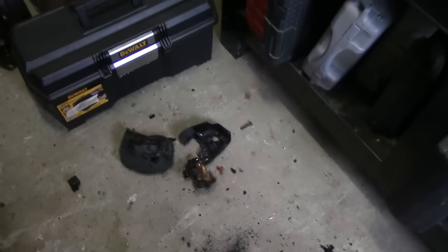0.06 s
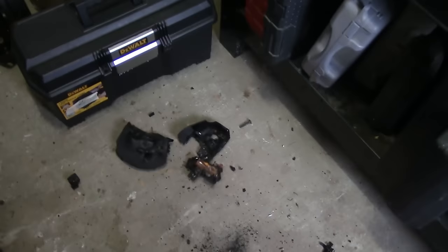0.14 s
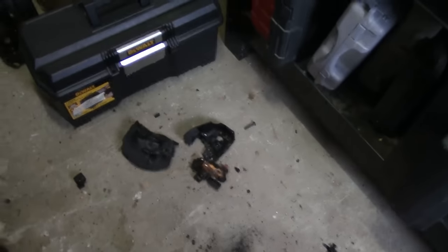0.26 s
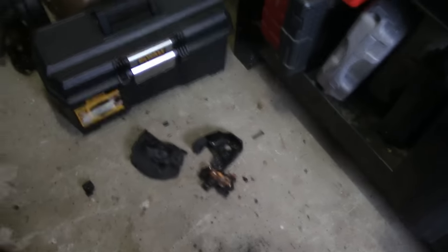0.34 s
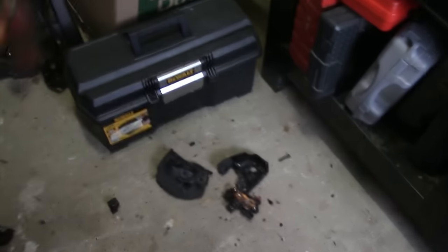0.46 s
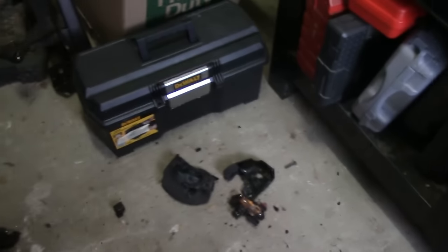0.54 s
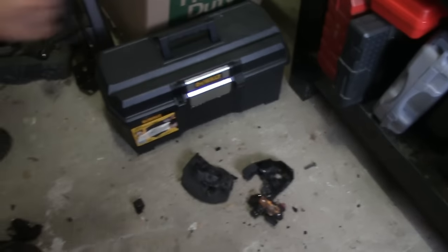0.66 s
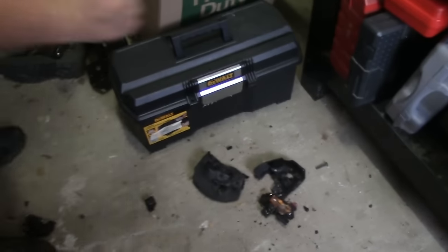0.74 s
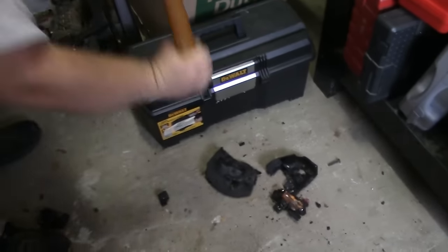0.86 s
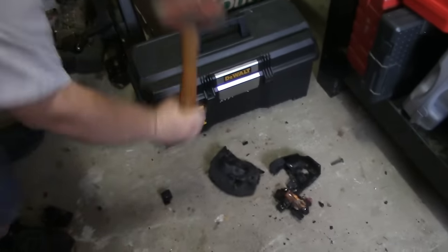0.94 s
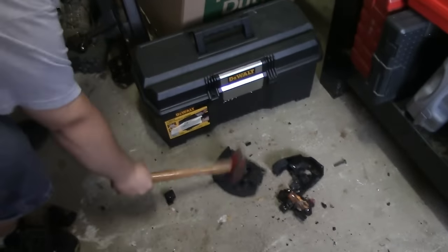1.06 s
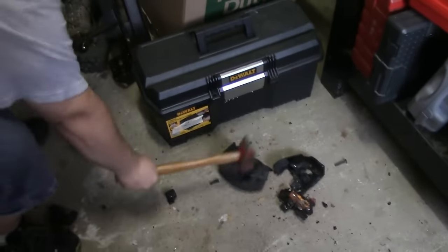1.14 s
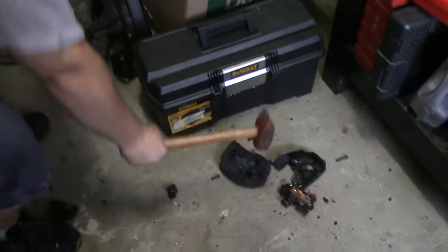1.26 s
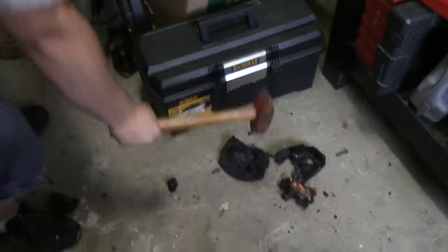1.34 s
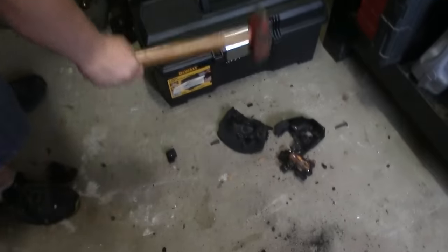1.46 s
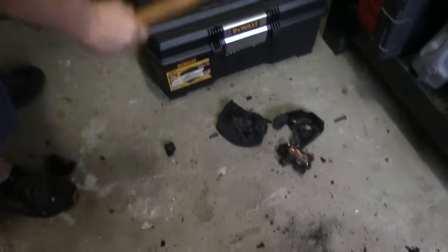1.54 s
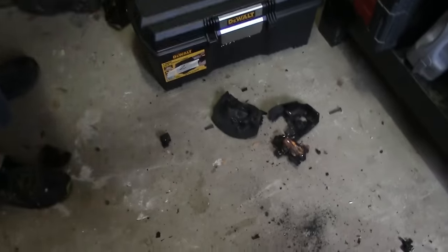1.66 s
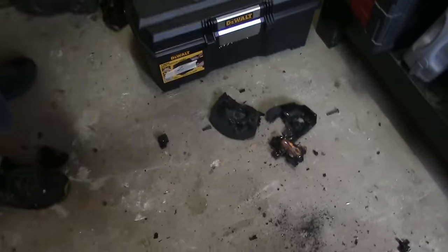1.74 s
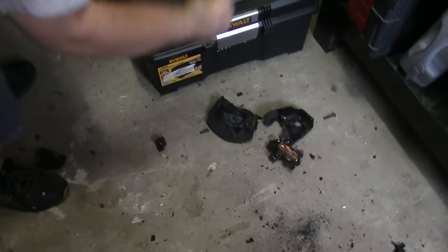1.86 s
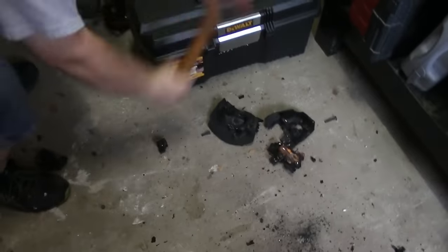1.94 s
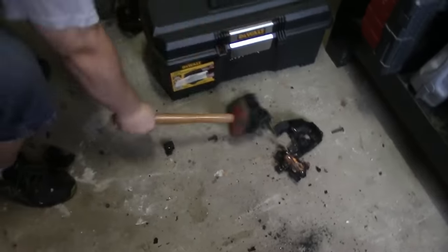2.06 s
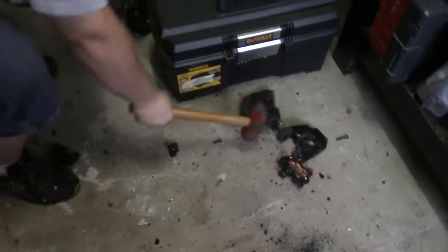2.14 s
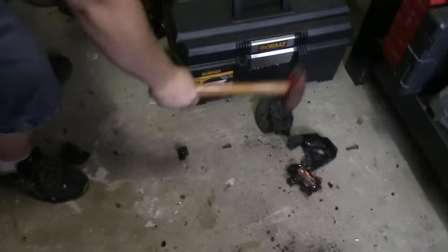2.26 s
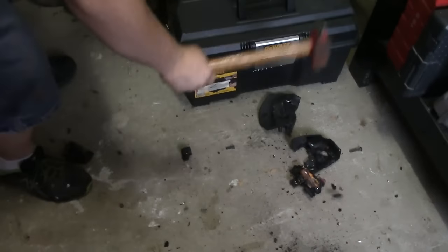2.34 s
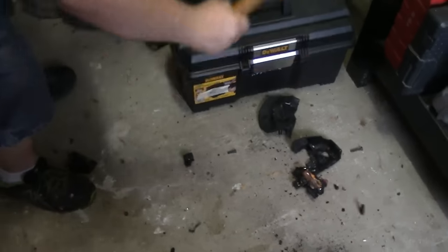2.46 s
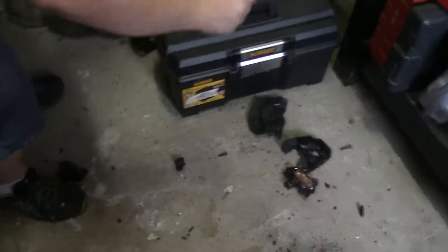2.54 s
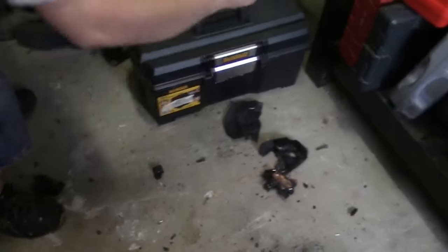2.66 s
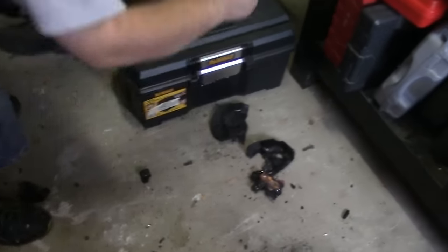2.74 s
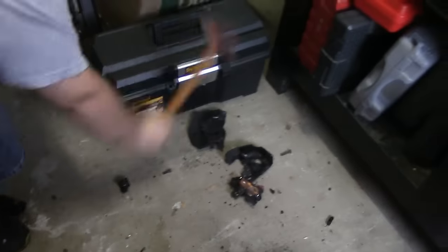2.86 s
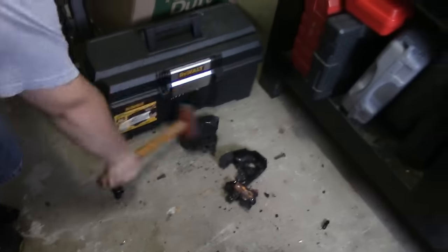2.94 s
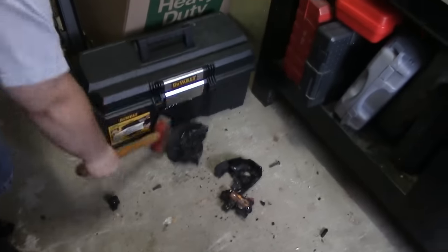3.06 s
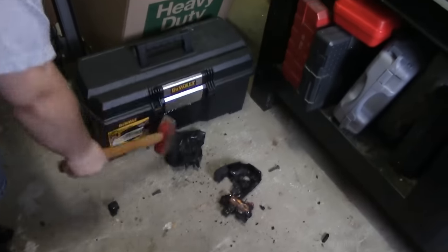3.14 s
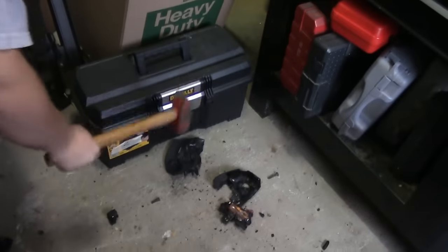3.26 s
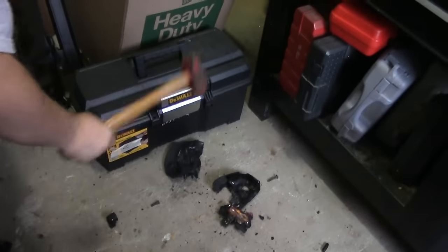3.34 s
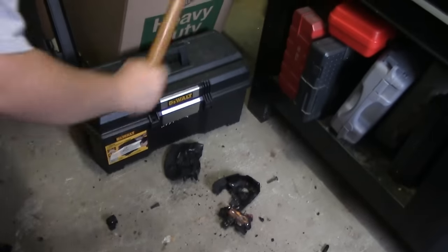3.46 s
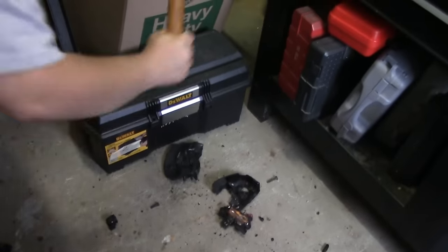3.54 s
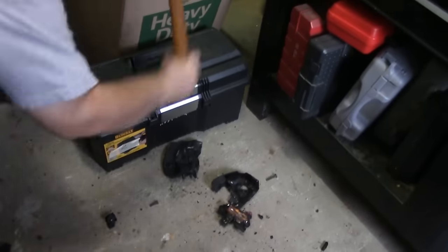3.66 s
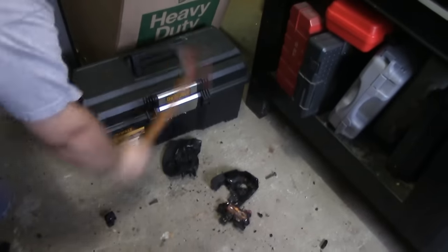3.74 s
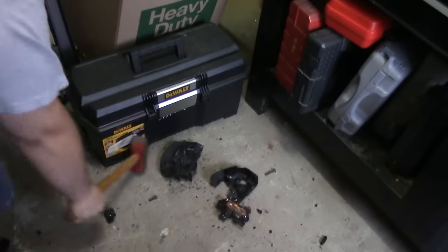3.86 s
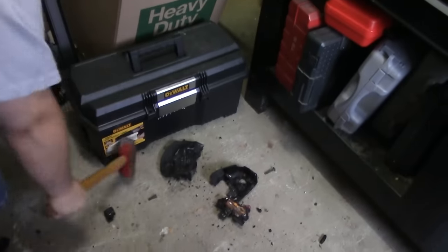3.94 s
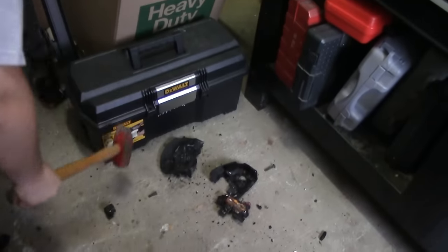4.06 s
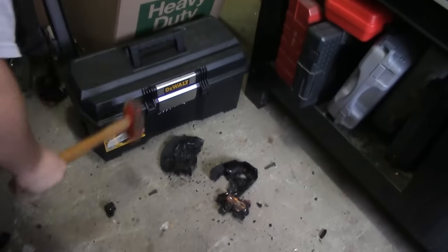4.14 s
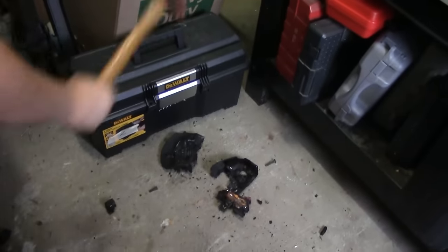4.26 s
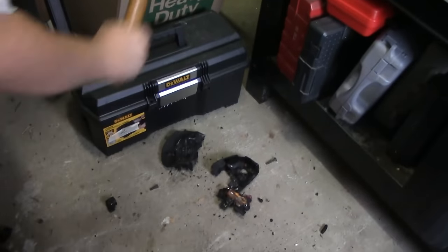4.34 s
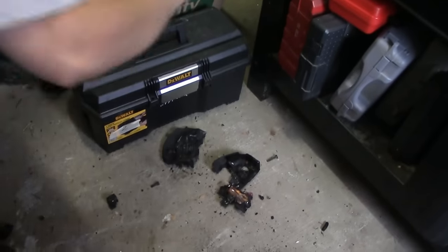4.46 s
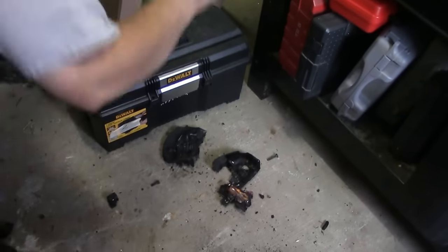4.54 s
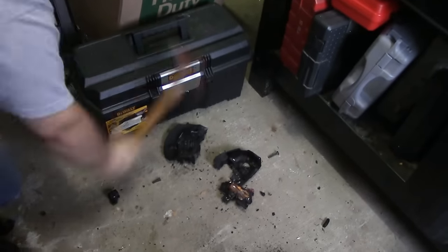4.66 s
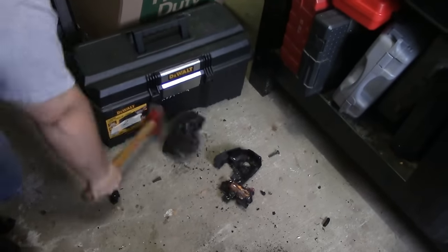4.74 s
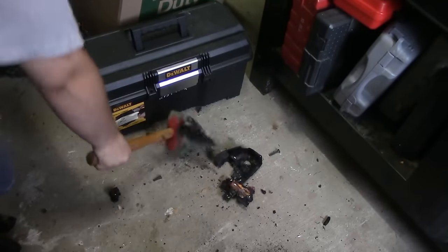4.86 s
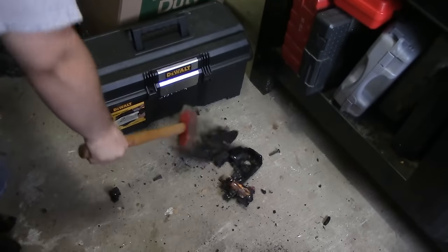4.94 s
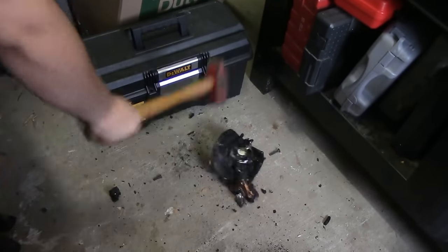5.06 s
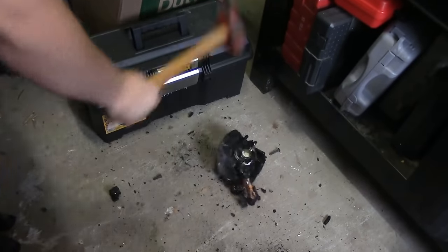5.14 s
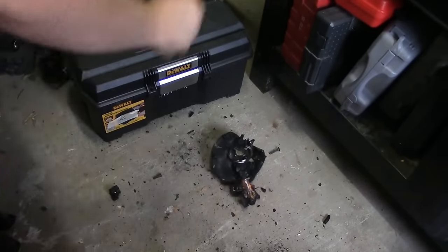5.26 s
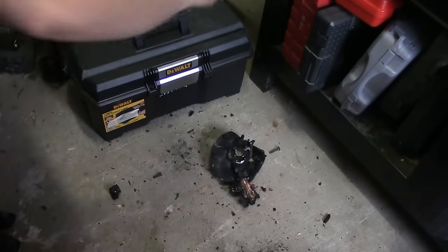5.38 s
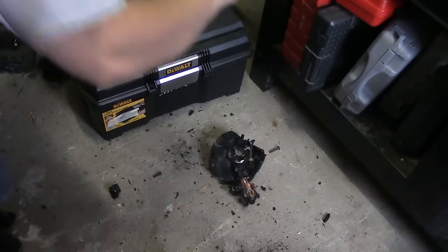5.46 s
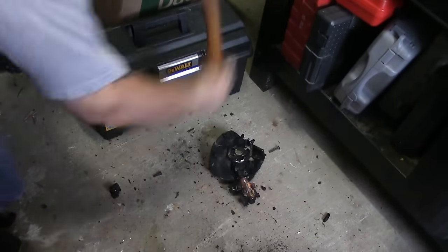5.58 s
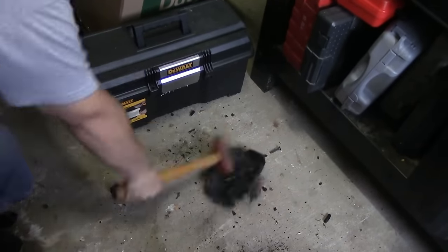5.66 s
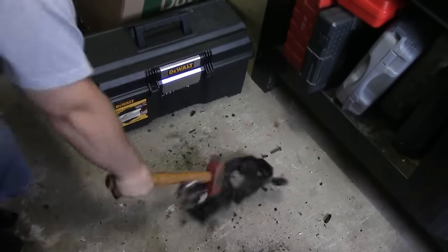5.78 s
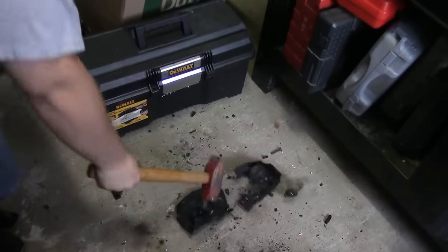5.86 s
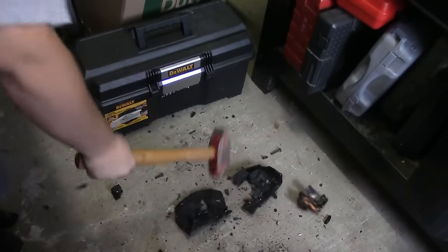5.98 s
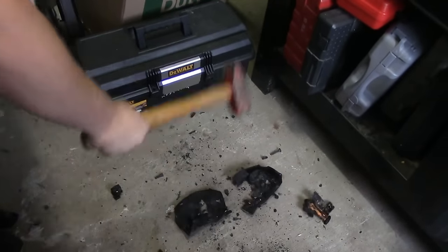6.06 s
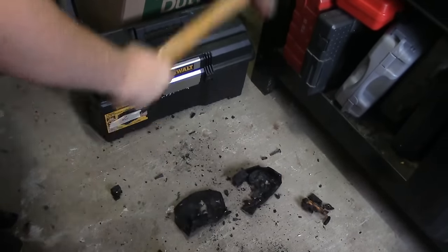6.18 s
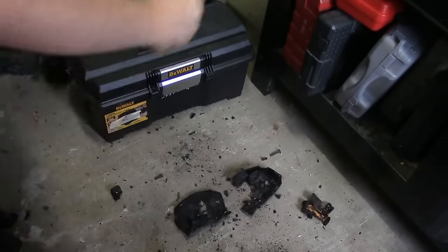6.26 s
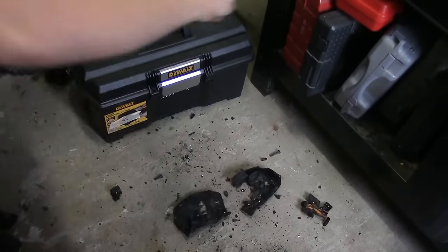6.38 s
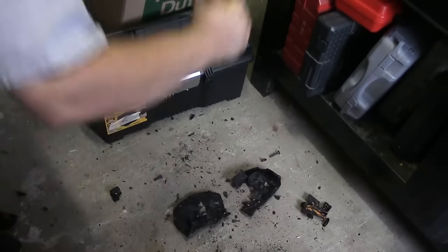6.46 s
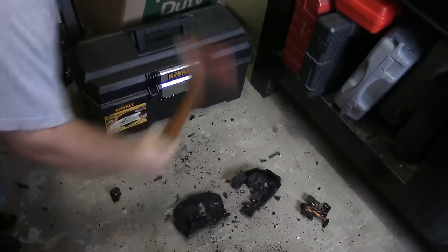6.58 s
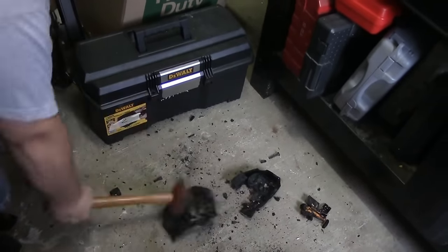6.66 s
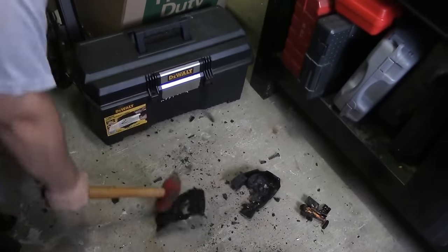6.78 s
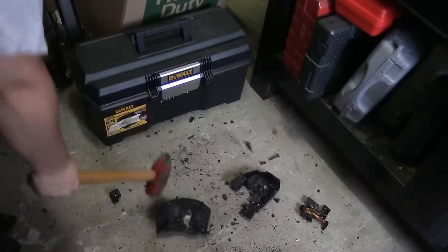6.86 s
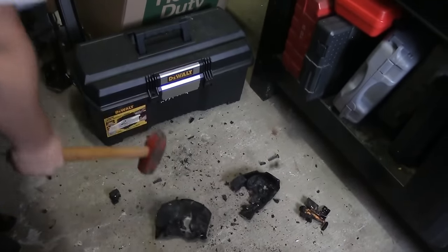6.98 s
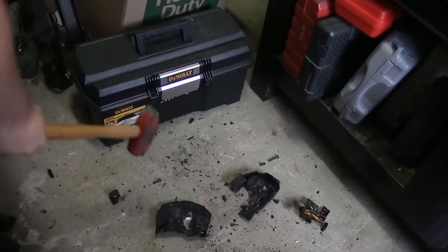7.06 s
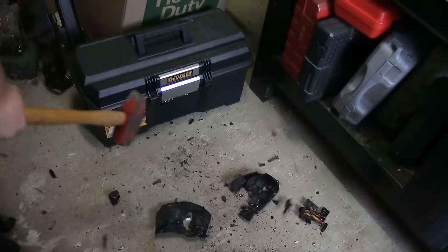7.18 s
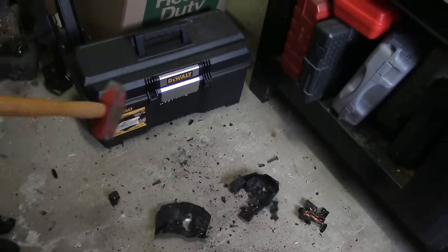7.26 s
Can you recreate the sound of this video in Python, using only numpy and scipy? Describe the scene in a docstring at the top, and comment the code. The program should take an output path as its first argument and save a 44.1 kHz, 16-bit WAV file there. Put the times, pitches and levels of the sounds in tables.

```python
"""Hammering plastic in a garage

A hammer smashes burnt plastic on a concrete floor, eight blows about a second apart. Each blow
crunches the piece and makes it ring. Plastic and clockwork bits fly, bump a toolbox and skitter
away. Shoes scuff and a motor hums faintly. An automatic gain control turns the sound down at
loud blows, then lets it creep back up."""
import sys
import numpy as np
from scipy import signal
from scipy.fft import rfft, irfft, next_fast_len
from scipy.io import wavfile
from scipy.ndimage import uniform_filter1d

SR = 44100
rng = np.random.default_rng(int(sys.argv[2]) if len(sys.argv) > 2 else 0)


def materialize(psi):
    """Save the field psi as 16-bit PCM at rate SR to the path in sys.argv[1].

    A 1-D psi becomes a single channel; in a 2-D psi each row is a channel.
    """
    bounded = np.clip(np.atleast_2d(psi).T, -1, 1)
    quanta = np.round(bounded * 32767).astype(np.int16)
    wavfile.write(sys.argv[1], SR, quanta)


N = 322715
TIME = np.arange(N) / SR
HIT_TIME = np.arange(SR // 4) / SR  # seconds into one impact

# tones of the motor's hum: f/Hz, level/dB
HUM_TONES = [(138, -63.5), (276, -54.5), (388, -58), (412, -60), (554, -59.5), (690, -65.5)]
# air rush of the motor's fan: f/Hz, level/dB
FAN_CURVE = [(30, -37.5), (85, -21), (130, -5), (200, -5.5), (420, -1), (700, 0.5), (1000, -4),
             (1400, -2.5), (2100, -8.5), (3200, -13.5), (5000, -22), (8000, -27), (15000, -43.5)]
# shoe scuffs: t/s, length/s, level/dB, treble/dB
SHOE_SCUFFS = [(0.653, 0.071, -43.5, -5), (0.888, 0.012, -46.5, 8), (0.927, 0.086, -55, 19),
               (0.996, 0.0045, -48, 26)]
# the garage's echo: f/Hz, level/dB, time to fade by 60 dB/s
ECHO_BANDS = [(60.4, -14, 0.25), (160, 0.5, 0.36), (444, 6.5, 0.3), (1240, -1, 0.42), (3470, 0.5, 0.39),
              (6500, 2, 0.39), (8850, 0, 0.32), (15000, -0.5, 0.28)]
# tone of the difference between two microphones: f/Hz, level/dB
SIDE_CURVE = [(50, 23), (150, -2), (400, -7), (1000, -1.5), (2200, 3.5), (5000, 8), (9000, 10),
              (14000, -0.5)]
# clockwork bits hitting the floor: t/s, level/dB, top treble/dB
CLOCKWORK_HITS = [(5.973, -17, -1), (5.998, -23, -1), (6.045, -30, 3), (6.071, -29, -7), (6.387, -39.5, 7),
                  (7.250, -23.5, 10)]
# ringing of the clockwork metal: f/Hz, width/Hz, level/dB
CLOCKWORK_RINGS = [(3130, 197, 0), (5040, 97, -7), (5880, 110, 3), (6080, 170, -1), (6570, 270, -4),
                   (8460, 500, -2), (11100, 880, -3), (12500, 500, -12)]
# pieces bumping the toolbox: t/s, level/dB, bass/dB
TOOLBOX_BUMPS = [(3.023, 2, -2), (3.082, -14.5, 2), (3.902, -7, 1), (4.782, 0.5, 3.5), (4.8, 5.5, 2),
                 (4.821, -2, -24), (4.897, -13, -10)]
# ringing of the toolbox walls: f/Hz, width/Hz, level/dB
TOOLBOX_RINGS = [(169.3, 32, 4.5), (267.8, 59, 3.5), (298, 7.3, -0.5), (370, 44, -8), (477, 49, -12.5),
                 (894, 180, -14)]
# larger plastic pieces landing: t/s, level/dB, f/Hz, ring/dB
PIECE_LANDINGS = [ (0.1183, -12.5, 1280, -0.5), (0.335, -30.5, 1124, 3.5), (2.384, -27.5, 2480, -4.5),
                  (3.129, -18.5, 3300, 0), (5.062, -12.5, 1660, -1), (5.086, -18.5, 1780, -14),
                  (5.326, -29, 1560, -7), (6.198, -32, 3310, 6), (6.785, 2, 387, -4),
                  (6.914, -13.5, 2863, 5.5), (6.943, -18.5, 2050, 5), (7.102, -25, 3040, 6), ]
# tone of cracking plastic: f/Hz, level/dB
CRACK_CURVE = [(40, -47), (150, -14.5), (450, 0), (750, 1), (1100, 1.5), (2000, 4.5), (3500, 3), (5500, -1),
               (9500, -2.5), (12500, -12.5), (16000, -22)]
# ringing of the steel hammer head: f/Hz, width/Hz, level/dB
HEAD_RINGS = [(3284, 17, 2.5), (7480, 130, 1), (9700, 260, -1)]
# hammer blows (the first is two rows); the piece breaks and turns, so its pitch moves:
# t/s, level/dB, crushing time/ms, f/Hz, lower ring/dB, upper ring/dB, shatter/0-1, body/dB, thump/dB
HAMMER_BLOWS = [ (0.0005, -8, 2, 882, 5.5, -2.5, .16, 2, -37.5),
                (0.0100, 7.5, 1, 1300, -2.5, -16.5, 0.1, 1, -42),
                (1.1220, 19, 3.82, 1473, 2.5, 7.5, .16, 4, -11),
                (2.0560, 19.5, 2.67, 1680, -2.5, -6.5, .14, -4.5, -19),
                (2.9663, 11, 2.72, 1610, -4.5, -11.5, .14, -15, -25.5),
                (3.8302, 9.5, 2.1, 1600, -15, -5.5, 0.3, -1.5, -31),
                (4.7536, 15.5, 3.1, 1900, 1.5, -5.5, .42, 6.5, -25.5),
                (5.6999, 14.5, 2.88, 2350, -4, -6.5, 0.4, -11, -42.5),
                (6.6946, 23.5, 2.06, 1425, -24, 2, .11, 1, -9.5), ]
# tone of floor grit, of crumbs, and of an impact's direct side signal: f/Hz, level/dB
GRIT_CURVE = [(200, -7), (800, 5), (2500, 4.5), (6000, -11), (14000, -28)]
CRUMB_CURVE = [(300, -7), (1500, 3.5), (4000, -4.5), (9000, -11), (15000, -19.5)]
DIRECT_SIDE_CURVE = [(200, -4), (2000, 4.5), (5000, -2), (12000, 1)]


def gain(db):
    """Turn decibels into a number to multiply by."""
    return 10 ** (np.asarray(db) / 20)


def unit(x):
    """Scale a sound so that its energy is 1."""
    return x / np.sqrt(np.sum(x ** 2) + 1e-18)


def add(out, start_s, x):
    """Mix x into out at a given time."""
    i = min(max(int(start_s * SR), 0), N)
    out[..., i:i + x.shape[-1]] += x[..., :N - i]


def colour(x, curve):
    """Shape the tone along a curve of (f/Hz, level/dB) points."""
    size = next_fast_len(len(x) + 4096, True) // 2 * 2
    hz, db = np.transpose(curve)
    log_hz = np.log(np.fft.rfftfreq(size, 1 / SR) + 1)
    cepstrum = irfft(np.log(gain(np.interp(log_hz, np.log(hz), db))))
    # this folding keeps the filter from sounding before its input
    cepstrum[1:size // 2] *= 2
    cepstrum[size // 2 + 1:] = 0
    return irfft(rfft(x, size) * np.exp(rfft(cepstrum)))[:len(x)]


def ring(x, hz, width_hz):
    """Ring at one pitch; the narrower the width, the longer it lasts."""
    return signal.lfilter(*signal.iirpeak(hz, hz / width_hz, fs=SR), x)


def ring_object(force, rings):
    """A struck object rings at several pitches at once."""
    return unit(sum(gain(db) * ring(force, hz, width) / np.sqrt(width) for hz, width, db in rings))


def fade(delay_s, decay_s):
    """Start suddenly after a delay, then die away."""
    return (HIT_TIME >= delay_s) * np.exp(-np.abs(HIT_TIME - delay_s) / decay_s)


def drift(rate_hz):
    """Wander smoothly at random, roughly between -1 and 1."""
    step = int(SR / rate_hz)
    return uniform_filter1d(np.repeat(rng.standard_normal(N // step + 1), step), step)[:N]


def fan(level_db):
    """The motor's fan pushes air with a soft, steady rush."""
    return gain(level_db) * np.sqrt(N) * unit(colour(rng.standard_normal(N), FAN_CURVE))


def motor(waver_hz=3.9, flutter_db=2.2):
    """A motor hums with tones that waver in level and pitch."""
    hum = 0
    for hz, db in HUM_TONES:
        level = gain(db + flutter_db * drift(rate_hz=8))
        pitch_hz = hz + waver_hz * drift(rate_hz=28)
        hum = hum + level * np.sin(2 * np.pi * np.cumsum(pitch_hz) / SR)
    return np.sqrt(2) * hum


def scuffs(grain_db=4):
    """Soles drag briefly over grit; crushed grains sound crisper."""
    grains = rng.standard_normal(N) * gain(grain_db * rng.standard_normal(N))
    grit = colour(grains, GRIT_CURVE)
    out = np.zeros(N)
    for t, length_s, db, treble_db in SHOE_SCUFFS:
        swell = np.exp(-2 * ((TIME - t) / length_s) ** 2)
        out += gain(db) * swell * unit(colour(grit, [(1500, 0.007), (5000, treble_db)]))
    return np.sqrt(N) * out


def garage_echo(first_echo_s=0.001, build_s=0.0012):
    """Walls and shelves echo differently for every spot on the floor."""
    size = SR * 2 // 3
    t = np.arange(size) / SR
    hz, levels_db, fades_s = np.transpose(ECHO_BANDS)
    noise = rfft(rng.standard_normal(size))
    log_hz = np.log(np.fft.rfftfreq(size, 1 / SR) + 1)
    tail = 0
    for db, fade_s, band in zip(levels_db, fades_s, np.eye(len(hz))):
        band_noise = irfft(noise * np.interp(log_hz, np.log(hz), band), size)
        tail = tail + gain(db - 60 * t / fade_s) * band_noise
    return unit(tail * (1 - np.exp(-np.maximum(t - first_echo_s, 0) / build_s)))


def in_garage(x, echo_db, direct_side_db=-7.5):
    """An impact and its echo, as mid (what two microphones share) and side (how they differ)."""
    heard = gain(echo_db) * np.array([signal.fftconvolve(x, garage_echo()) for _ in range(2)])
    heard[0, :len(x)] += x
    heard[1, :len(x)] += gain(direct_side_db) * colour(x, DIRECT_SIDE_CURVE)
    return heard


def crunch(shape):
    """A burst of tiny fractures, about equally strong at all pitches, fading with the given shape."""
    spectrum = rfft(shape * rng.standard_normal(len(HIT_TIME)), 2 * len(HIT_TIME))
    burst = irfft(spectrum / (np.abs(spectrum) + 1e-12))[:len(HIT_TIME)]
    return unit(burst * np.sqrt(shape))


def crack(force, body_db, treble_db):
    """A brittle snap; a big piece has more body, a hard contact more treble."""
    snap = colour(force, CRACK_CURVE)
    return unit(colour(snap, [(700, body_db), (1500, 0.0011), (3000, 0), (9000, treble_db)]))


def rattle(bounce_db=-6, decay_s=0.0035):
    """The force of a light piece that lands and tips onto a second edge."""
    bounce_s = rng.uniform(0.0033, 0.0074)
    return crunch(fade(0, decay_s) + gain(bounce_db) * fade(bounce_s, decay_s))


def clatter(hz, ring_db, treble_db_per_octave=13, neutral_hz=2580):
    """Plastic lands with a snap and a short ring; smaller pieces ring higher and click brighter."""
    force = rattle()
    # the less a piece is damped, the louder and narrower its ring
    width_hz = hz * min(0.19 * gain(-2 * ring_db), 0.5)
    snap = crack(force, body_db=-1.5, treble_db=treble_db_per_octave * np.log2(hz / neutral_hz))
    ringing = gain(ring_db) * unit(ring(force, hz, width_hz))
    return in_garage(unit(snap + ringing), echo_db=-4)


def chips(count=2, flight_s=(0.13, 0.96), pitch_hz=(3943, 10760), softest_db=-52, spread_db=6):
    """Small chips fly off at each blow and tick down a moment later."""
    out = np.zeros((2, N))
    for t, *_ in HAMMER_BLOWS:
        for flight, pitch, strength in rng.random((count, 3)):
            lands_s = t + np.interp(flight, [0, 1], flight_s)
            tick = clatter(np.interp(pitch, [0, 1], pitch_hz), ring_db=-2)
            add(out, lands_s, gain(softest_db + spread_db * strength) * tick)
    return out


def clockwork(ring_db=-2.5):
    """Small metal parts click and tinkle; a sharper contact wakes their highest rings."""
    out = np.zeros((2, N))
    for t, db, top_db in CLOCKWORK_HITS:
        force = colour(rattle(), [(6500, 0), (11000, top_db)])
        click = crack(force, body_db=-8, treble_db=9)
        tinkle = gain(ring_db) * ring_object(force, CLOCKWORK_RINGS)
        add(out, t, gain(db) * in_garage(unit(click + tinkle), echo_db=-1))
    return out


def toolbox(decay_s=0.0076, knock_db=-12):
    """Dull knocks boom in the hollow box; some of its walls sound deeper than others."""
    out = np.zeros((2, N))
    for t, db, bass_db in TOOLBOX_BUMPS:
        push = crunch(fade(0, decay_s))
        force = colour(push, [(50, -6), (150, bass_db), (300, 7), (600, 2), (1500, 7), (6000, -24.5)])
        bump = unit(ring_object(force, TOOLBOX_RINGS) + gain(knock_db) * unit(force))
        add(out, t, gain(db) * in_garage(bump, echo_db=-4))
    return out


def landings():
    """The larger plastic pieces clatter onto the concrete."""
    out = np.zeros((2, N))
    for t, db, hz, ring_db in PIECE_LANDINGS:
        add(out, t, gain(db) * clatter(hz, ring_db))
    return out


def crumbs(count=70, settle_s=0.03, scatter_db=4):
    """Many tiny bits patter down after a blow, the late ones weakest."""
    clicks = np.zeros(len(HIT_TIME))
    clicks[rng.integers(0, len(HIT_TIME), count)] = gain(scatter_db * rng.standard_normal(count))
    return unit(colour(clicks * fade(0, settle_s), CRUMB_CURVE))


def thump(force, hz=245, width_hz=380):
    """The low thump of the loudest blows overloading the microphone."""
    return unit(ring(ring(force, hz, width_hz), hz, width_hz))


def hammer(decay_s=0.0039, upper_ratio=1.761, crumbs_db=-5, clink_db=-11):
    """The head cracks the piece, then hits concrete; shattering widens the rings and sprays crumbs."""
    out = np.zeros((2, N))
    for t, db, crush_ms, hz, lower_db, upper_db, shatter, body_db, thump_db in HAMMER_BLOWS:
        # the longer the crushing, the harder the head meets the floor
        floor_hit = gain(-6 + 4 * crush_ms) * fade(crush_ms * 1e-3, decay_s)
        force = crunch(fade(0, decay_s) + floor_hit)
        rings = [(hz, lower_db), (upper_ratio * hz, upper_db)]
        ringing = sum(gain(ring_db) * unit(ring(force, f, shatter * f)) for f, ring_db in rings)
        snap = crack(force, body_db, treble_db=0.5)
        smash = unit(snap + ringing) + shatter * gain(crumbs_db) * crumbs()
        add(out, t, gain(db) * in_garage(smash, echo_db=-5))
        # the head's clink and the low thump get no echo
        clink = gain(clink_db) * ring_object(force, HEAD_RINGS)
        add(out[0], t, gain(db) * (gain(thump_db) * thump(force) + clink))
    return out


def scene(impact_db=16, width_db=-20):
    """Mix all sources to left and right; the two close microphones differ only a little."""
    mid, side = gain(impact_db) * (hammer() + landings() + clockwork() + chips() + toolbox())
    mid = mid + scuffs() + motor() + fan(level_db=-46.5)
    side = colour(gain(width_db) * side + fan(level_db=-66), SIDE_CURVE)
    # the tiny gap between the microphones shifts their difference by a quarter cycle
    side = signal.hilbert(side, next_fast_len(N)).imag[:N]
    return np.array([mid + side, mid - side])


def record(dry, threshold_db=-6, release_db_per_s=5, window_s=0.0048, attack_s=0.0011,
           peak_limit=0.63, low_cut_hz=60, high_cut_hz=15500):
    """Gain control dips fast at loud blows and recovers slowly; peaks are rounded, bass and top cut."""
    power = uniform_filter1d(np.mean(dry, axis=0) ** 2, int(window_s * SR))
    over_db = np.maximum(10 * np.log10(np.abs(power) + 1e-12) - threshold_db, 0)
    recovery_db = release_db_per_s * TIME
    dip_db = np.maximum.accumulate(over_db + recovery_db) - recovery_db
    smoothing = np.exp(-1 / (attack_s * SR))
    dip_db = signal.lfilter([1 - smoothing], [1, -smoothing], dip_db)
    rounded = peak_limit * np.tanh(dry * gain(-dip_db) / peak_limit)
    thinned = signal.lfilter(*signal.butter(1, low_cut_hz, "high", fs=SR), rounded)
    return signal.sosfilt(signal.ellip(10, 0.2, 80, high_cut_hz, fs=SR, output="sos"), thinned)


dry = scene()
out = record(dry)
materialize(out)
```